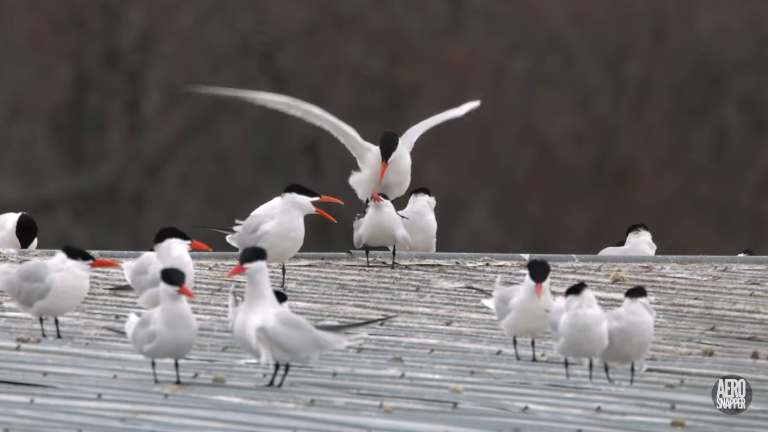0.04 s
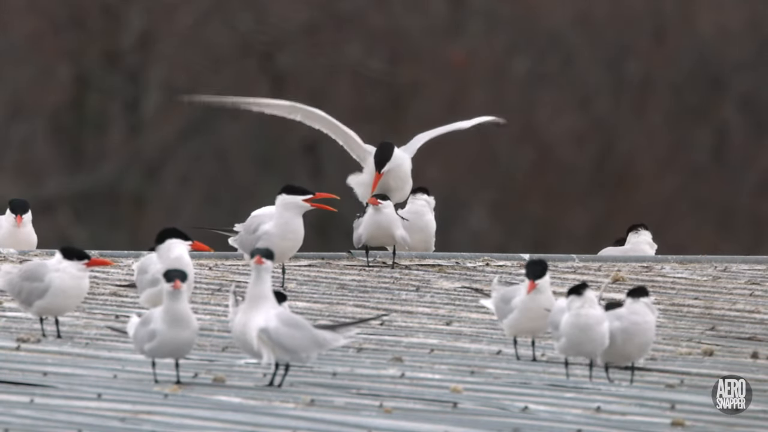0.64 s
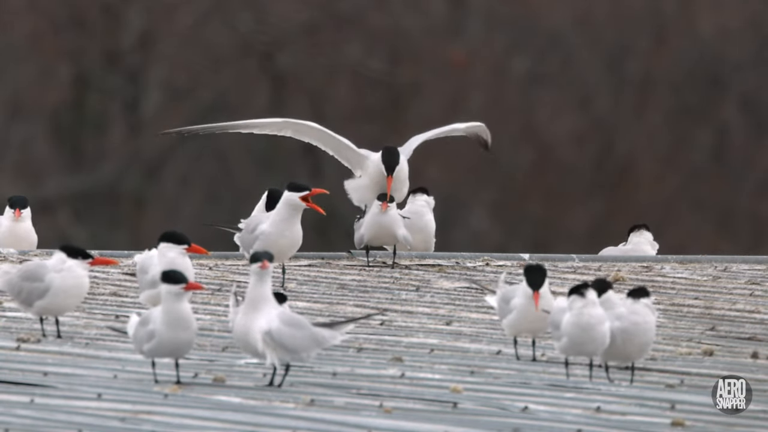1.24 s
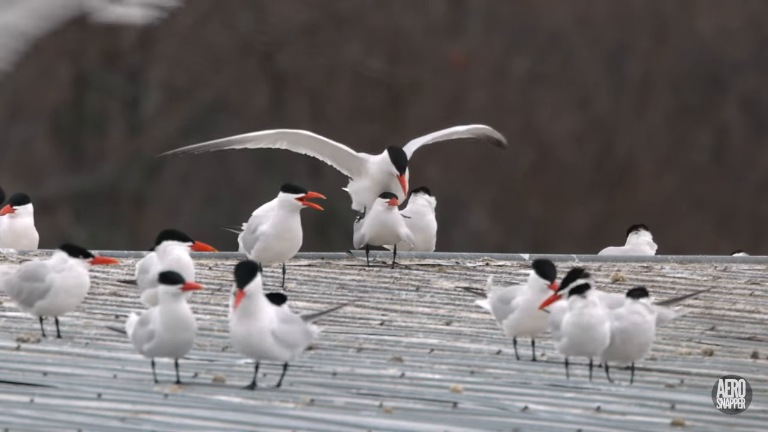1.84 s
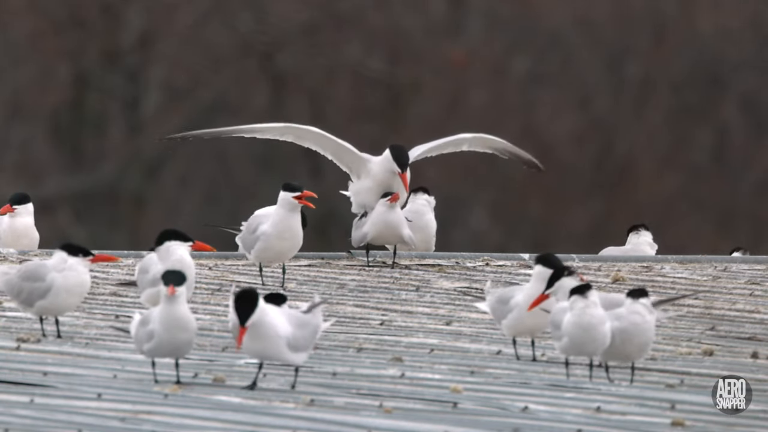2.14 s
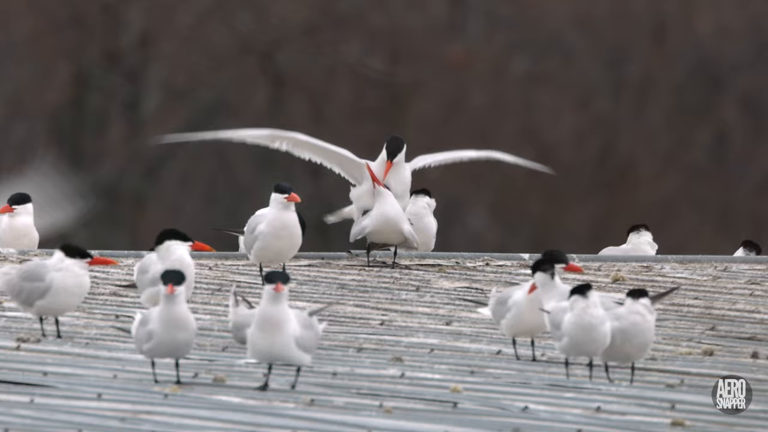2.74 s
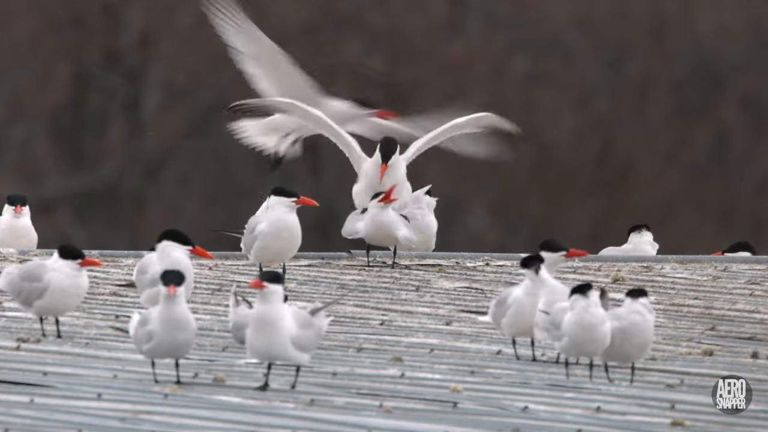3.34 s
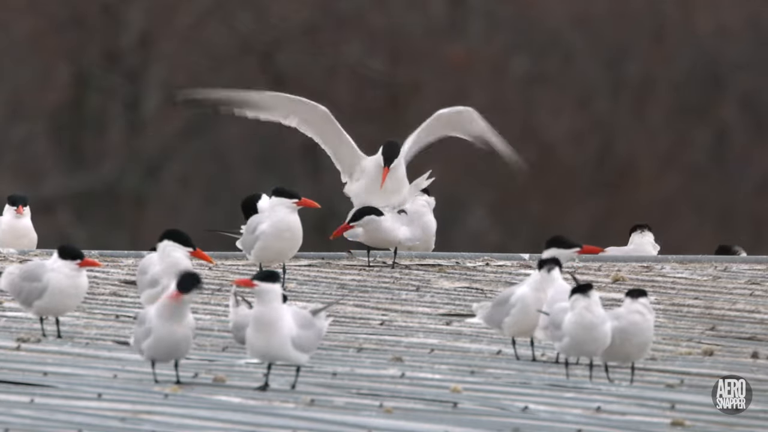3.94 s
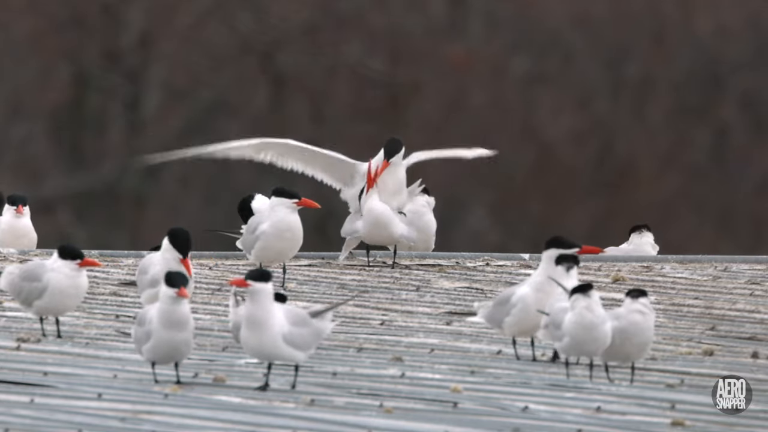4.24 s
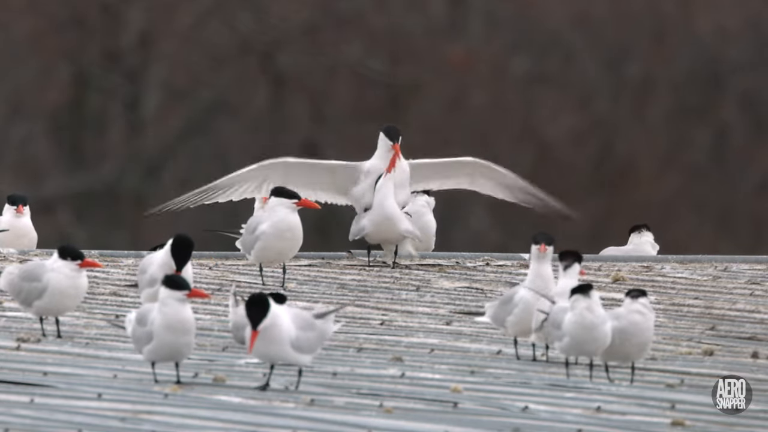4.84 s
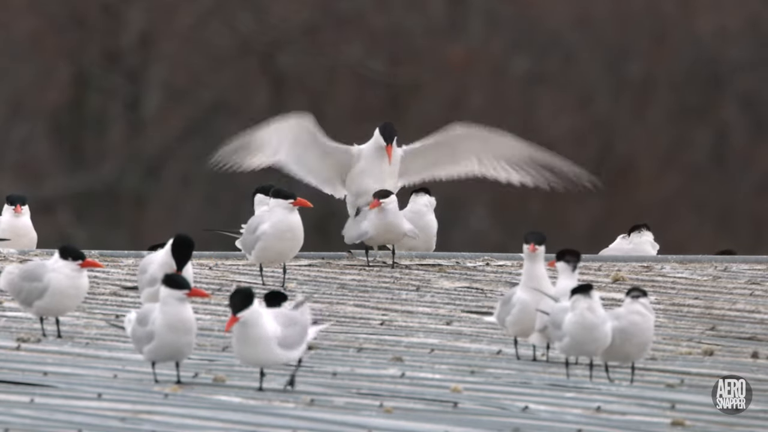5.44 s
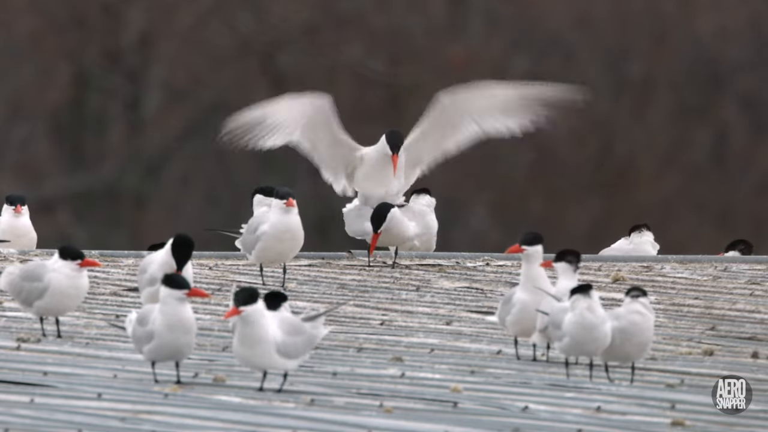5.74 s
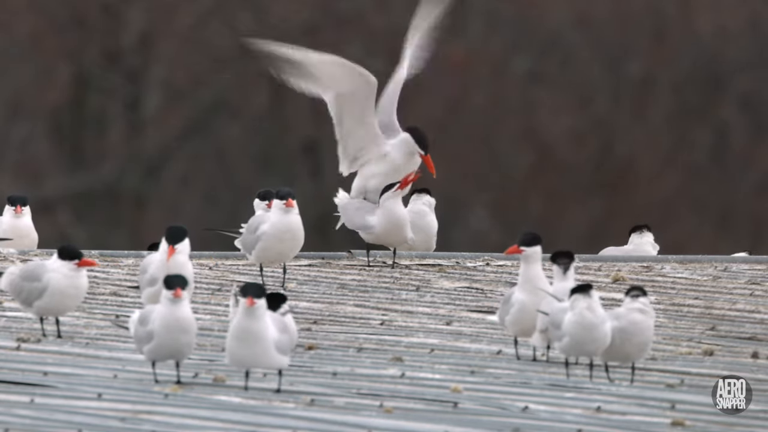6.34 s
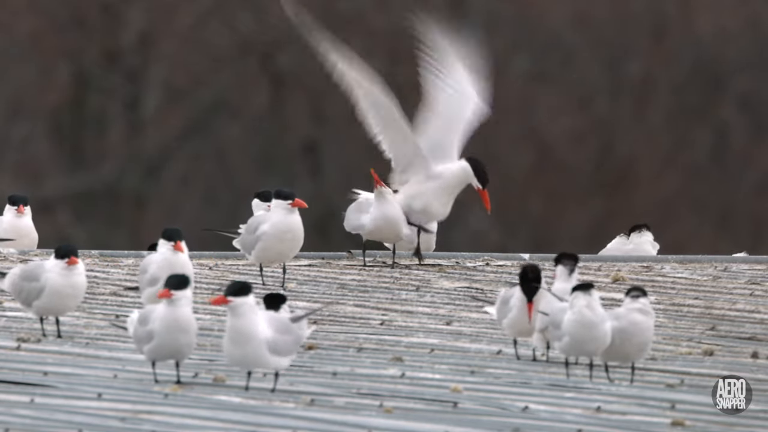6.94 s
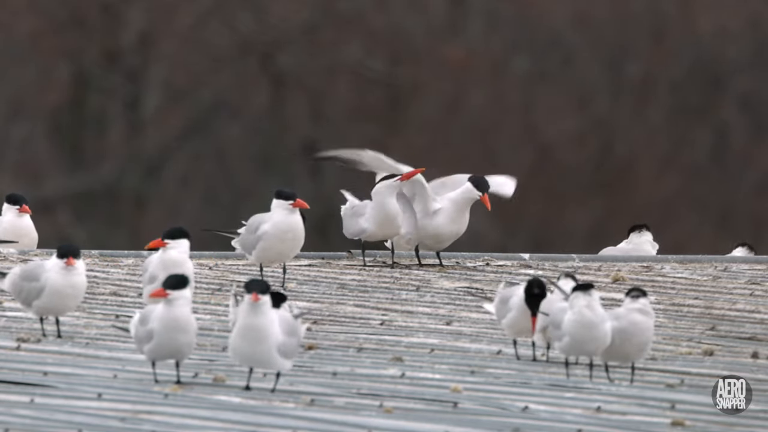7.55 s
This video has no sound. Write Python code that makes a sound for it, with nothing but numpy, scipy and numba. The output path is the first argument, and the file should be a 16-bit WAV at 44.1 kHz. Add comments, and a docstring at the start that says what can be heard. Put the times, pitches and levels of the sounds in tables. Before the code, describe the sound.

A colony of terns calls outdoors in harsh, irregular bursts, picked up by one microphone at a distance with a faint echo from trees. Low-key raspy growls build to piercing screams and a run of grating squawks, ease briefly, then return as a long screech and a rising caw. A far road hums throughout, with a few tiny chirps late on.

```python
"""A low roof by a wood, with one mono microphone some way off: terns screech and growl at each other.
Each voice is an unsteady tone near 800 Hz, chopped into a rasp by a fast flap, mixed with hiss
and coloured by bill and throat. Small birds chirp far away and the trees return a faint echo.
Behind it all lies the rumble of a distant road."""
import sys
import numpy as np
from scipy import signal
from scipy.fft import rfft, irfft, next_fast_len
from scipy.io import wavfile
from scipy.ndimage import uniform_filter1d
from numba import njit

SR = 44100
rng = np.random.default_rng(int(sys.argv[2]) if len(sys.argv) > 2 else 0)


def wav_record(signal):
    """Record a signal, one row per channel, as 16-bit PCM in the file named by sys.argv[1]."""
    frames = np.transpose(np.atleast_2d(signal))
    bounded = np.clip(frames, -1, 1)
    # unit amplitude maps onto the largest positive 16-bit level
    quanta = np.round(bounded * 32767).astype(np.int16)
    wavfile.write(sys.argv[1], SR, quanta)


N = 339129

# Distant traffic and open air: (frequency [Hz], relative level [dB])
AIR_SPECTRUM = [(15, -64.5), (25, -25), (87, -1), (211, -3.5), (260, -5.5), (296, -9), (662, -10),
                (1240, -11.5), (1520, -11), (2130, -20), (2430, -19), (3230, -29.5), (4190, -30.5),
                (6190, -39), (12500, -48.5), (16200, -73), (22000, -120)]
# Drone of far engines: (centre [Hz], width [Hz], level [dB])
ENGINE_BANDS = [(66.5, 10, -71), (103.3, 6.8, -63), (144.5, 14, -61), (192, 37, -63), (570, 110, -62.5),
                (818, 276, -54.5)]
# Tyre roar swelling and easing: (time [s], gain [dB])
TYRE_SWELL = [(0, 2.5), (.7, 2), (1.5, 1.5), (2.2, 0), (3.7, -1.5), (5, 0), (6, -2), (7.69, -1)]

# Terns on the roof, one table for each kind of call. A call builds to a peak, relaxes and stops:
# (start [s], build [s], hold [s], peak level [dB], swell to the peak [dB], sag after it [dB],
#  treble minus body [dB], onset pitch [Hz], peak pitch [Hz], final pitch [Hz], peak roughness [0-1])
GROWLS = [(0, 0.019, 0.19, -48, -11, 1.5, -13.5, 950, 939, 958, 0.88),
          (.62, 0.078, 0.0089, -45.5, 9, 6, -11, 950, 950, 840, .8),
          (1.56, .12, 0.18, -42, 5, 1.5, -17.5, 950, 1001, 973, 0.61),
          (1.685, .05, 0.019, -37, 12, 10, -3, 835, 835, 847, 0.7)]
CROAKS = [(.24, 0.25, 0.062, -49, 6.1, 1, -9.5, 694, 720, 710, 0.65),
          (.445, 0.053, 0.0061, -37.5, 8, 4.4, -15, 740, 770, 712, 0.41),
          (2.16, .34, .012, -40, 13, 4, -2, 654, 765, 720, .42)]
CHATTER = [(.76, 0.23, .07, -53.5, 5, 1, -11, 800, 904, 950, 0.89),
           (1.08, 0.36, 0.33, -44, 6, .5, -15, 980, 987, 955, 0.77),
           (2.52, .04, 0.16, -45, 2, 1, -14.5, 965, 960, 973, .8)]
SCREAMS = [(2.695, .085, 0.036, -29, 9.6, 4.5, -6.5, 866, 911, 869, 0.21),
           (2.85, .33, .06, -25.5, 14, 14, -10, 867, 1009, 833, .15)]
SQUAWKS = [(3.195, 0.0401, 0.12, -33.5, 4, 1, -.5, 661, 669, 692, .3)]
CAWS = [(3.35, .24, 0.026, -40.5, 2.5, 2.2, -14.5, 700, 760, 728, 0.28),
        (7.13, .52, .05, -40, 16.3, 0.44, -9.5, 739, 810.4, 823, 0.24)]
SNARLS = [(3.8, .385, 0.043, -35, 9.1, 4.5, -8.5, 702, 835, 732, 0.53)]
RASPS = [(4.24, .04, .26, -48, 1, 1, -10, 900, 925, 900, .85),
         (4.37, .055, .04, -34.5, 10, 2, -9.5, 925, 990, 960, .87),
         (4.535, .415, .21, -33.3, 7.5, 7, -7.5, 850, 940, 710, .52)]
FAR_CALLS = [(5.2, .1, .01, -52.5, 3, 3, 0.5, 778, 787, 773, 0.88),
             (5.39, 0.066, .05, -52.5, 5, 1, -3, 792, 794, 793, 0.92),
             (5.52, .3, .12, -51.5, 2, .5, -20, 757, 756, 756, 0.93)]
SCREECHES = [(5.955, .07, 0.032, -35, 10, 2, -6, 968, 1028, 1010, 0.76),
             (6.085, .385, 0.26, -31, 13.3, 9.3, -7, 854, 1021, 810, .45)]

# Sliding resonances of windpipe and bill: (frequency at the onset [Hz], slide [Hz/s], gain [dB])
GROWL_BILL = [(2110, -100, 2), (3370, -100, -11.5), (4130, -100, 0)]
CROAK_BILL = [(1890, 455, 2.5), (3470, -450, -3), (3690, 297, 3.5)]
CHATTER_BILL = [(2030, -50, 2), (2630, -50, -1.5), (3680, 502, -8)]
SCREAM_BILL = [(2394, 300, 5.5), (3670, 660, 1.6), (4320, 510, 7)]
SQUAWK_BILL = [(2080, 50, -6), (3350, 450, 9.5), (3780, 500, 13.5)]
CAW_BILL = [(1970, 250, 5), (2920, 100, 5), (3710, 300, -4)]
SNARL_BILL = [(2100, -200, -7), (4150, 346, 1), (4960, 148, 11)]
RASP_BILL = [(2050, 280, 1.2), (2790, 900, -2.3), (3340, 2100, 2)]
FAR_BILL = [(2210, -400, -3), (2970, -900, 2), (3180, -900, 0)]
SCREECH_BILL = [(2620, -700, 3), (2950, 1200, 7), (3940, 1500, -4)]

# Colour of the throat: (frequency [Hz], relative gain [dB])
GROWL_THROAT = [(590, -44), (1000, -22), (1410, -4), (2040, -6.5), (2390, -9.5), (3110, -12), (3370, -5),
                (3720, -18.5), (4160, -14.5), (4640, -16), (11000, -52.5), (14300, -87), (22000, -120)]
CROAK_THROAT = [(590, -54), (1000, -26), (1200, -10), (1320, -2.5), (1550, -4.5), (1750, -14), (2060, -7.5),
                (2620, -11.5), (2990, -10), (3840, -19), (5240, -30), (11000, -58), (14300, -83),
                (22000, -120)]
SCREAM_THROAT = [(470, -51), (800, -21), (1110, -20.5), (1390, -11), (1540, -12), (1750, -11.5),
                 (1960, -6.5), (2170, -9), (2570, -10), (2850, -13.5), (3910, -22), (5310, -32.5),
                 (6890, -41), (12000, -64), (15600, -102), (22000, -120)]
CAW_THROAT = [(590, -51), (1000, -21), (1200, -9.5), (1520, -6), (1840, -10), (2700, -16), (3800, -23),
              (5130, -36.5), (7200, -45.5), (11000, -66), (14300, -93), (22000, -120)]
SNARL_THROAT = [(590, -59), (1000, -26), (1200, -12), (1550, -12), (1740, -16), (2060, 2), (2350, -13.5),
                (2570, -8.5), (4200, -24.5), (5080, -36), (5450, -40), (7000, -46), (11000, -53),
                (14300, -85), (22000, -120)]
RASP_THROAT = [(590, -50), (1000, -16), (1200, -18), (1460, 0), (1720, -7), (2100, 0.5), (2440, -6),
               (4460, -20), (5960, -38.5), (11000, -71), (14300, -94), (22000, -120)]
SCREECH_THROAT = [(590, -50), (1000, -25), (1100, -16), (2030, -10.5), (3340, -13), (3750, -16),
                  (4470, -15), (5390, -25), (8080, -37.5), (12000, -52), (15600, -84), (22000, -120)]

# Upward sweep thrown by each closing of the flap: (length [s], from [Hz], to [Hz])
FLAP_SLAP = (.0035, 903, 7500)
# Notch above the bill's highest resonance: (offset [Hz], width [Hz])
BILL_NOTCH = (780, 82)
# Thin whistling resonance of the bill: (centre [Hz], width [Hz], gain [dB])
BILL_WHISTLE = (6910, 490, 1.1)

# Small birds far from the microphone: (centre time [s], pitch [Hz], level [dB], glide [octaves])
FAR_CHIRPS = [(.022, 3000, -45, -0.22), (5.26, 5840, -70, .1), (5.41, 5300, -61, .1),
              (5.565, 5150, -65, 0.16), (5.7, 5000, -66, 0.19), (5.83, 4700, -59, .15),
              (5.845, 4000, -61, .1), (6.83, 3924, -57, 0.16), (7.0, 5600, -74, -0.12),
              (7.385, 5000, -61, -0.14), (7.53, 4450, -64, .1)]

PITCH_LEAD_S, RELEASE_S = .02, .045  # a tern's pitch turns a little before its level does


def undb(db):
    """Decibels to gain."""
    return 10 ** (np.asarray(db) / 20)


def unit(x):
    """Scale to rms 1."""
    return x / np.sqrt(np.mean(x ** 2) + 1e-20)


def shape(x, gain):
    """Filter by a gain that is a function of frequency."""
    size = next_fast_len(len(x) + 1024)
    hz = np.maximum(np.arange(size // 2 + 1) * SR / size, 1)
    return irfft(rfft(x, size) * gain(hz), size)[:len(x)]


def colour(points, hz):
    """Gain of a (frequency [Hz], level [dB]) spectrum on a log-frequency axis."""
    points_hz, db = np.transpose(points)
    return undb(np.interp(np.log(hz), np.log(points_hz), db))


def below(hz, edge_hz, order=8):
    """Gain of a low-pass."""
    return 1 / (1 + (hz / edge_hz) ** order)


def wander(count, rate_hz):
    """Random drift of rms 1 that swings up to about rate_hz times a second."""
    place = np.arange(count) * 2 * rate_hz / SR
    knots = rng.standard_normal(int(place[-1]) + 2)
    return unit(np.interp(place, np.arange(len(knots)), knots))


def even(x, span_s=.041):
    """Hold the level at 1 over a span, keeping the faster grain."""
    power = np.abs(uniform_filter1d(x ** 2, int(span_s * SR)))
    return x / np.sqrt(power + 1e-20)


@njit
def resonance(x, hz, width_hz):
    """State-variable band-pass with a moving centre, gain 1 there."""
    y, band, low = np.empty(len(x)), 0., 0.
    for i in range(len(x)):
        step, damping = np.tan(np.pi * hz[i] / SR), width_hz / hz[i]
        mid = (band + step * (x[i] - low)) / (1 + step * (step + damping))
        band, low = 2 * mid - band, low + 2 * step * mid
        y[i] = damping * mid
    return y


def traffic(air_db=-47.8, waver_db=.78):
    """A far road: engine drone in the bass, tyre roar that swells slowly, thin hiss on top."""
    def engine_gain(hz):
        return sum(undb(db) * np.sqrt(SR / 2 / width) * np.exp(-np.pi / 2 * ((hz - centre) / width) ** 2)
                   for centre, width, db in ENGINE_BANDS)

    air = unit(shape(rng.standard_normal(N), lambda hz: colour(AIR_SPECTRUM, hz)))
    road = undb(air_db) * air + shape(rng.standard_normal(N), engine_gain)
    roar = shape(road, lambda hz: below(hz, 1300, order=4) - below(hz, 260, order=4))
    swell_db = np.interp(np.arange(N) / SR, *np.transpose(TYRE_SWELL))
    return road + roar * (undb(swell_db + waver_db * wander(N, 4.1)) - 1)


def effort(t, build_s, relax_s):
    """Share of the build still to come, and how far the bird has relaxed since the peak, both 0-1."""
    slack = np.clip(1 - t / build_s, 0, 1)
    relaxed = 1 - np.exp(-(np.maximum(t - build_s, 0) / relax_s) ** 2)
    return slack, relaxed


def syrinx(pitch, rough, rasp_hz, depth, second_db, hiss_db, slip=2.56, rasp_jitter=.097, slap_db=-9,
           jitter=.0351, bend=.022, slip_hz=150):
    """A shaky tone rich in harmonics; a flap chops it, bends its pitch, gates the hiss and slaps shut."""
    n = len(pitch)
    flap_turns = np.cumsum(rasp_hz * (1 + rasp_jitter * wander(n, 81))) / SR
    flap = np.cos(2 * np.pi * flap_turns)
    shake = rough * (jitter * wander(n, 202.2) + bend * flap)
    phase = 2 * np.pi * np.cumsum(pitch * (1 + shake)) / SR
    # the second harmonic stays clearest; the others slip further in phase and spread into bands
    tone = undb(second_db) * np.sin(2 * phase + slip * rough * wander(n, slip_hz))
    for harmonic in (1, *range(3, 14)):
        tone += np.sin(harmonic * phase + slip * (1 + rough) / 2 * wander(n, slip_hz))
    hiss = undb(hiss_db) * np.sqrt(rough) * rng.standard_normal(n)
    bursts = np.exp(depth * np.sqrt(rough) * flap) * undb(.5 * rough * wander(n, 70))
    slap_s, from_hz, to_hz = FLAP_SLAP
    sweep = signal.chirp(np.arange(int(slap_s * SR)) / SR, from_hz, slap_s, to_hz)
    closings = np.diff(np.floor(flap_turns), prepend=0)
    slaps = signal.fftconvolve(closings, sweep, mode="same")
    return unit((unit(tone) + hiss) * bursts) + undb(slap_db) * rough * unit(slaps)


def bill(x, resonances, t, whistle_lift, width_hz=230.):
    """Windpipe and bill ring at three sliding resonances, with a notch above and a thin whistle on top."""
    offset_hz, notch_width = BILL_NOTCH
    whistle_hz, whistle_width, whistle_db = BILL_WHISTLE
    rings = [(hz + slide * t, db) for hz, slide, db in resonances]
    x = x + sum(undb(db) * resonance(x, hz, width_hz) for hz, db in rings)
    notch_hz = rings[-1][0] + offset_hz
    x = x - resonance(x, notch_hz, float(notch_width))
    return x + undb(whistle_db) * resonance(x, whistle_hz * whistle_lift, float(whistle_width))


def tern(calls, resonances, throat, rasp_hz, low_db, open_db, hoarse, quicken=0, attack_s=.021, arch=.55,
         relax_s=.0703, crack=0, whistle_follow=0, chatter=0, chatter_hz=26, split_hz=2800, **voice):
    """One kind of call: with effort the voice grows louder, clearer and mostly higher, then relaxes."""
    out = np.zeros(N + 2 * SR)
    for (start, build, hold, peak_db, swell_db, sag_db, bright_db,
         onset_hz, peak_hz, final_hz, rough) in calls:
        t = np.arange(int((build + hold + RELEASE_S) * SR)) / SR
        slack, relaxed = effort(t, build, relax_s)
        to_rise, fallen = effort(t + PITCH_LEAD_S, build, relax_s)
        risen = np.exp(-(to_rise / arch) ** 2)
        pitch = onset_hz + (peak_hz - onset_hz) * risen + (final_hz - peak_hz) * fallen
        # the voice starts hoarse and may crack as the pitch drops; the rattle may quicken near the peak
        roughness = np.clip(rough + hoarse * slack + crack * np.sqrt(fallen) * (1 - fallen), .02, 1)
        rattle_hz = rasp_hz * (1 + quicken * risen ** 10)
        cry = syrinx(pitch, roughness, rattle_hz, **voice)
        cry = bill(cry, resonances, t, whistle_lift=(pitch / onset_hz) ** whistle_follow)
        cry = shape(cry, lambda hz: colour(throat, hz) * undb(low_db * below(hz, 820)) * below(hz, 11500))
        # as the bill opens, the treble shifts by open_db against the body of the voice
        body = shape(cry, lambda hz: below(hz, split_hz, order=20))
        cry = even(body) + undb(bright_db - open_db * slack) * even(cry - body)
        # a chattering bird pulses its call into quick notes
        notes = unit(np.exp(chatter * np.cos(2 * np.pi * chatter_hz * t)))
        edges = np.clip(np.minimum(t / attack_s, (t[-1] - t) / RELEASE_S), 0, 1)
        level = undb(peak_db - swell_db * slack - sag_db * relaxed)
        at = int(start * SR)
        out[at:at + len(t)] += edges * notes * level * cry
    return out[:N]


def colony():
    """All the terns, some way from the microphone, from hoarse growls to clear screams."""
    growls = tern(GROWLS, GROWL_BILL, GROWL_THROAT, rasp_hz=105.5, depth=.46,
                  second_db=0, hiss_db=4.5, low_db=2, open_db=-2, hoarse=.19)
    croaks = tern(CROAKS, CROAK_BILL, CROAK_THROAT, rasp_hz=141.9, depth=.7,
                  second_db=9, hiss_db=-.5, low_db=-3, open_db=12, hoarse=.9,
                  rasp_jitter=.013, slap_db=3.5, quicken=.3, arch=.45)
    chatter = tern(CHATTER, CHATTER_BILL, GROWL_THROAT, rasp_hz=209.7, depth=.3,
                   second_db=-6.5, hiss_db=6.5, low_db=-1, open_db=2, hoarse=.12, chatter=.16)
    screams = tern(SCREAMS, SCREAM_BILL, SCREAM_THROAT, rasp_hz=185.1, depth=.51,
                   second_db=10, hiss_db=4.5, low_db=0, open_db=-1, hoarse=.45,
                   slip=2.1, slap_db=-4.5, arch=.35, relax_s=.066, crack=.37)
    squawks = tern(SQUAWKS, SQUAWK_BILL, SCREAM_THROAT, rasp_hz=194, depth=.52,
                   second_db=0, hiss_db=5.5, low_db=-3, open_db=-1, hoarse=.1, slip=2.7)
    caws = tern(CAWS, CAW_BILL, CAW_THROAT, rasp_hz=167.5, depth=.72,
                second_db=4.5, hiss_db=5, low_db=-12, open_db=4.5, hoarse=.39, slip=2.2)
    snarls = tern(SNARLS, SNARL_BILL, SNARL_THROAT, rasp_hz=160, depth=.41,
                  second_db=8.5, hiss_db=3, low_db=-5, open_db=11, hoarse=.039, arch=.65, relax_s=.05)
    rasps = tern(RASPS, RASP_BILL, RASP_THROAT, rasp_hz=176.2, depth=.49,
                 second_db=4, hiss_db=5, low_db=1, open_db=7, hoarse=.32, attack_s=.033, relax_s=.05)
    far_calls = tern(FAR_CALLS, FAR_BILL, CAW_THROAT, rasp_hz=150.7, depth=.36,
                     second_db=-6, hiss_db=0, low_db=-17, open_db=1, hoarse=.03)
    screeches = tern(SCREECHES, SCREECH_BILL, SCREECH_THROAT, rasp_hz=189.4, depth=.38,
                     second_db=10, hiss_db=5.5, low_db=-20, open_db=-.5, hoarse=.53,
                     rasp_jitter=.066, slap_db=-7, arch=.5, relax_s=.065, crack=.82, whistle_follow=.9)
    return growls + croaks + chatter + screams + squawks + caws + snarls + rasps + far_calls + screeches


def small_birds(spread_s=.007):
    """Far-off chirps: short gliding whistles, each under a bell-shaped swell."""
    out = np.zeros(N)
    for centre_s, hz, db, glide in FAR_CHIRPS:
        first, last = int((centre_s - 4 * spread_s) * SR), int((centre_s + 4 * spread_s) * SR)
        at = np.arange(max(first, 0), min(last, N))
        offset = (at / SR - centre_s) / spread_s
        pitch = hz * 2 ** (glide * offset / 2) * (1 + .022 * wander(len(at), 400))
        out[at] += undb(db) * np.exp(-offset ** 2 / 2) * np.sin(2 * np.pi * np.cumsum(pitch) / SR)
    return out


def tree_echo(x, t60_s=.52, wet_db=-16, dull_hz=4000, rise_s=.0087):
    """Trunks in the wood scatter a dull echo back to the microphone."""
    t = np.arange(SR) / SR
    tail = rng.standard_normal(SR) * undb(-60 * t / t60_s) * np.clip(t / rise_s, 0, 1)
    tail = shape(tail, lambda hz: below(hz, dull_hz, order=2))
    return undb(wet_db) * signal.fftconvolve(x, unit(tail) / np.sqrt(SR))[:N]


def scene():
    """Birds, their echo and the road at the microphone, alike in both channels."""
    birds = colony() + small_birds()
    return np.tile(birds + tree_echo(birds) + traffic(), (2, 1))


def record(dry):
    """The camera's microphone cuts the top steeply."""
    top_hz = 12850
    low_pass = signal.ellip(10, .05, 60, top_hz, fs=SR, output="sos")
    return signal.sosfiltfilt(low_pass, dry)


dry = scene()
out = record(dry)
wav_record(out)
```